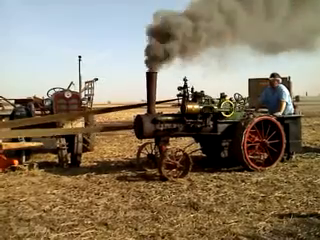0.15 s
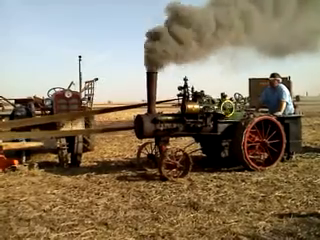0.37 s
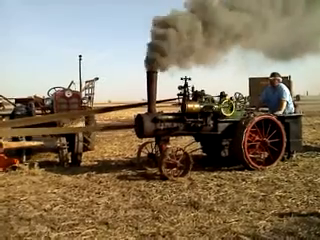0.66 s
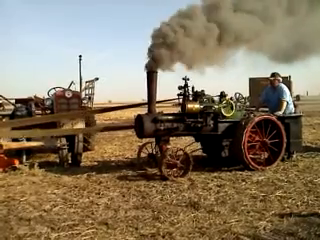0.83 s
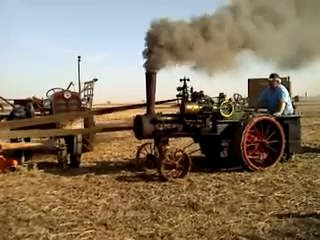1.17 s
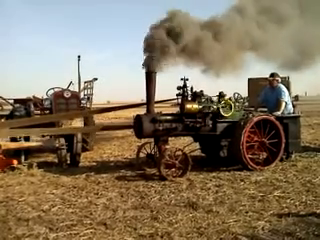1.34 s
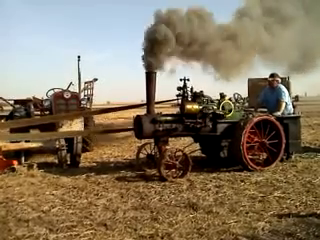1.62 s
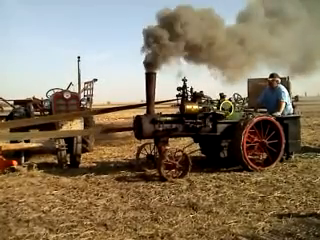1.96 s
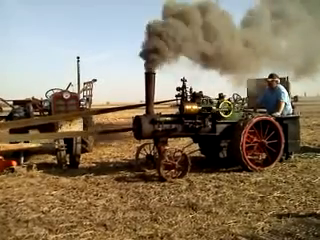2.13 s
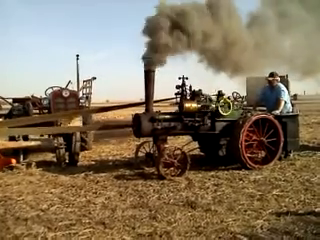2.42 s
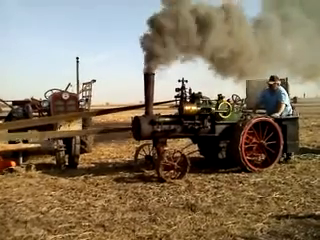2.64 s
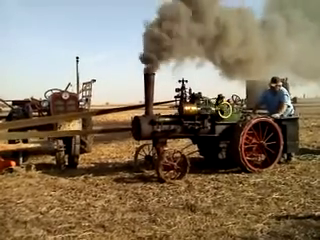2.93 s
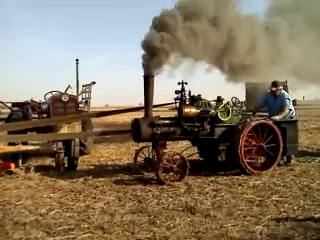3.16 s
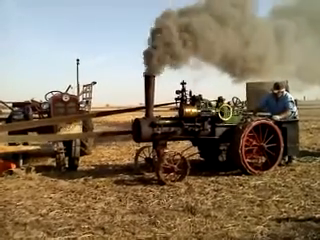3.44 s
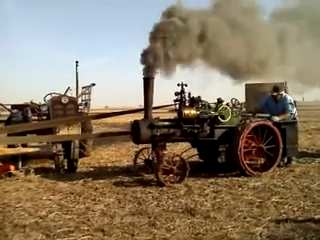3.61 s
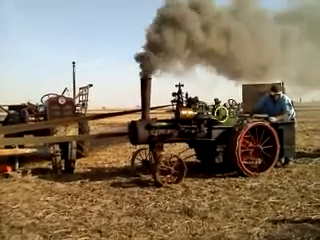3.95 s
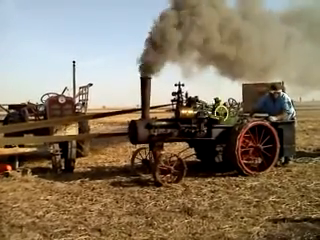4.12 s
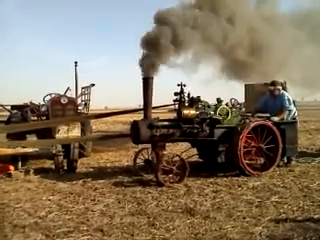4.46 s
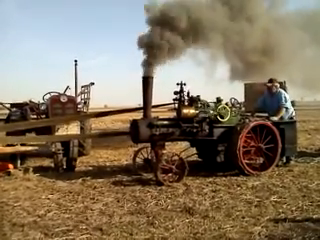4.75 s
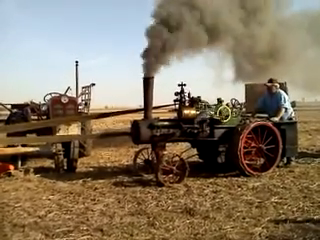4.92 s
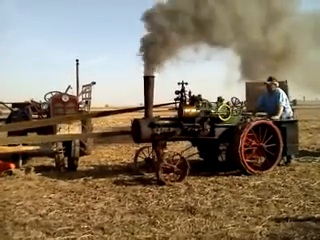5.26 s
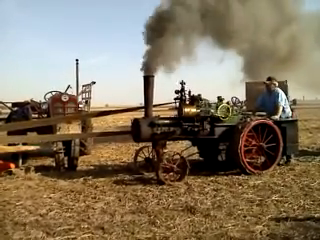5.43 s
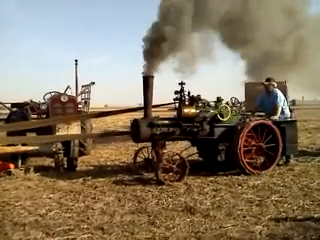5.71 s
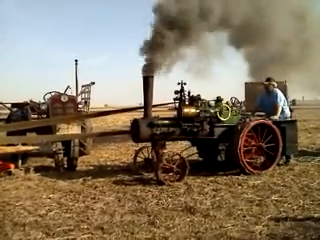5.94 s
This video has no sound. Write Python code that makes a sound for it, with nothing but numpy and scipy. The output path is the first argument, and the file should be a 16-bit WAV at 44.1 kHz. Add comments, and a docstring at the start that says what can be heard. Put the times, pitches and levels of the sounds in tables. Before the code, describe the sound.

Fast fluttering steam puffs, steady hiss and low belt rumble mix with an unsteady piercing saw scream, all distorted by a small clipping microphone.

```python
"""A harsh, fluttering roar: a steam traction engine labours on the belt of a sawmill in an open field.
Puffs of noise chuff up its stack nearly eleven times a second over hissing steam.
A skidding sine and ringing noise make the saw's screech; shaped noise makes its rasp, a hollow drone and a rumble.
A small microphone colours the noises with a low treble peak, and its overloaded amplifier clips the whole din."""
import sys
import numpy as np
from scipy.fft import rfft, irfft, next_fast_len
from scipy.io import wavfile
from scipy.ndimage import map_coordinates

SR = 44100
rng = np.random.default_rng(int(sys.argv[2]) if len(sys.argv) > 2 else 0)


def dump_mix(stems):
    """Bounce the given channels to the path in sys.argv[1] as a 16-bit WAV at rate SR."""
    frames = np.atleast_2d(stems).T  # one column per channel
    limited = np.clip(frames, -1, 1)  # hard clip at full scale
    pcm = np.round(limited * 32767).astype(np.int16)
    wavfile.write(sys.argv[1], SR, pcm)


N = 268128
TIME = np.arange(N) / SR  # seconds


def amp(db):
    """Level law: decibels become an amplitude ratio."""
    return 10 ** (np.asarray(db) / 20)


def unit(x):
    """Normalisation: the signal is scaled to an rms of 1."""
    return x / np.sqrt(np.mean(x ** 2) + 1e-20)


def curve(rows, at=TIME):
    """Linear interpolation between rows of time and value."""
    seconds, values = np.transpose(rows)
    return np.interp(at, seconds, values)


def colour(points):
    """Spectral envelope: (Hz, dB) points are joined by straight lines on a log frequency axis."""
    point_hz, point_db = np.transpose(points)

    def response(hz):
        return amp(np.interp(np.log(hz + 1), np.log(point_hz + 1), point_db))
    return response


def resonances(modes):
    """Modal superposition: second-order resonances of alternating sign add up."""
    def response(hz):
        total = 0
        for k, (centre, width, db) in enumerate(modes):
            damping = 1j * hz * width
            total = total + (-1) ** k * amp(db) * damping / (centre ** 2 - hz ** 2 + damping)
        return total
    return response


def filtered(x, response):
    """Linear filtering: the spectrum is multiplied by a frequency response."""
    size = next_fast_len(N + 8192)  # padding lets the ringing die out
    hz = np.fft.rfftfreq(size, 1 / SR)
    return irfft(rfft(x, size) * response(hz), size)[:N]


def wobble(rate):
    """Random modulation: a smooth curve runs through normal random knots, rate of them a second."""
    knots = rng.standard_normal(int(N * rate / SR) + 4)
    return map_coordinates(knots, [TIME * rate])


# Response of the microphone, which peaks in the low treble and hears little above.
# Each row: frequency in Hz, gain in dB.
MICROPHONE_RESPONSE = [(100, 1), (1250, 0), (1700, -0.3), (2000, 7), (2250, 7), (2400, 7.5), (2600, 7),
                       (2800, 8), (3050, 6.5), (3450, 1), (3800, -8.5), (4300, -30.5), (6000, -32.5),
                       (16000, -40)]


def rush(response):
    """Broadband noise: white noise takes the colour of source and microphone, then an rms of 1."""
    microphone = colour(MICROPHONE_RESPONSE)
    noise = rng.standard_normal(N)
    return unit(filtered(noise, lambda hz: response(hz) * microphone(hz)))


def swell(s, length, roundness=1.89):
    """Pulse envelope: a bump of height 1 at time s stays over a half for length seconds."""
    bump = np.zeros(N)
    near = np.abs(TIME - s) < 2 * length
    bump[near] = .5 ** (np.abs(2 * (TIME[near] - s) / length) ** roundness)
    return bump


# Effort of the engine, which rises as the saw bites harder.
# Each row: time in seconds, effort in dB.
ENGINE_EFFORT = [(0, -1.5), (.4, .6), (.65, -1.3), (1.15, .5), (1.7, 0), (2.05, .8), (2.5, 1.1),
                 (2.78, -1.6), (3.1, 2.6), (3.45, -.6), (3.95, 1), (4.5, 0.8), (5.1, -0.7), (6.08, 0.3)]


def effort(at=TIME):
    """Common load: one curve of effort drives the rumble, the screech and the steam."""
    return curve(ENGINE_EFFORT, at)


# Spectrum of the belt's rumble. Each row: frequency in Hz, relative level in dB.
RUMBLE_SPECTRUM = [(15, -27), (45, -11), (90, -1), (180, -0.5), (300, -8.5), (800, -17.5)]


def belt_rumble(level_db=-27, growth=1.2, flap_db=2):
    """Forced vibration: the belt's low noise grows with the pull on it, by growth dB per dB of effort."""
    level = level_db + growth * effort() + flap_db * wobble(12)
    return amp(level) * rush(colour(RUMBLE_SPECTRUM))


# Low resonances of the machinery. Each row: frequency in Hz, width in Hz, relative level in dB.
HOLLOW_MODES = [(335, 39, -0.5), (441, 62, -7.5)]
# Course of the drone. Each row: time in seconds, level in dB before the boost.
DRONE_COURSE = [(0, -35), (2.4, -27), (4.7, -25.5), (5.15, -18), (5.4, -28), (5.58, -20), (5.8, -29),
                (6.05, -19.5)]


def hollow_drone(boost_db=1.0, waver_db=1.2):
    """Resonance: noise through two low modes of the machinery sounds hollow and slowly wavers."""
    level = curve(DRONE_COURSE) + boost_db + waver_db * wobble(5.07)
    return amp(level) * rush(resonances(HOLLOW_MODES))


# Spectrum of the rasping teeth. Each row: frequency in Hz, relative level in dB.
RASP_SPECTRUM = [(300, -20), (900, -8), (1500, 22), (2000, 19.5), (2400, 8.5), (3200, -20), (6000, -25)]
# The teeth meet more or less wood. Each row: time in seconds, level in dB.
RASP_COURSE = [(0, -21), (.4, -13.5), (1.15, -13), (1.35, -29), (1.95, -9), (2.4, -15.5), (3.05, -13),
               (3.55, -17.5), (3.9, -15), (4.55, -14.5), (5.1, -30), (5.85, -16)]


def teeth_rasp():
    """Friction noise: the teeth tear through the log in a narrow band of noise that comes and goes."""
    return amp(curve(RASP_COURSE)) * rush(colour(RASP_SPECTRUM))


# Resonances of the blade. Each row: frequency in Hz, width in Hz, relative level in dB.
BLADE_MODES = [(2363, 87, 1.3), (2586, 28, 5), (2735, 87, -1)]
# Centre of the skidding tone. Each row: time in seconds, frequency in Hz.
SCREAM_CENTRE = [(0, 2680), (.2, 2580), (1.2, 2590), (1.38, 2690), (1.9, 2560), (2.55, 2630), (2.85, 2570),
                 (3.15, 2660), (4.5, 2570), (5.05, 2690), (6.08, 2660)]


def screech(level_db=-7.5, growth=0.51, unsteady_db=0.84, tone_db=-0.2, ring_db=-5, chatter_db=1.9):
    """Frequency modulation: a shrill tone skids about in pitch beside noise ringing in the steel's modes."""
    level = level_db + growth * effort() + unsteady_db * wobble(25)
    ring = rush(resonances(BLADE_MODES))
    drift, waver, jitter = 45 * wobble(22), 125 * wobble(100), 140 * wobble(520)  # Hz
    pitch = curve(SCREAM_CENTRE) + drift + waver + jitter
    phase = 2 * np.pi * np.cumsum(pitch) / SR
    tone = unit(np.sin(phase) * amp(chatter_db * wobble(110)))
    return amp(level) * (amp(tone_db) * tone + amp(ring_db) * ring)


# Speed of the engine, which holds and then labours a little.
# Each row: time in seconds, piston strokes a second.
ENGINE_SPEED = [(0, 10.7), (4.2, 10.64), (4.5, 10.5), (4.9, 10.5), (5.3, 10.5), (5.55, 9.9), (5.9, 10.3)]
# A few strokes cough harder. Each row: time in seconds, extra puff level in dB,
# bark level in dB above its usual mean, in place of the random scatter.
HARD_COUGHS = [(.26, 1, 5.5), (2.55, 2, 5.5), (3.62, 2.5, 4), (3.91, .5, 7), (4.47, 1.5, 5), (4.85, 0, 9),
               (5.04, 1.5, 4), (5.73, 3, 3)]
FIRST_STROKE_S = 0.07  # mean time of the first puff's height
PUFF_DB, PUFF_S = -4.5, .058  # level at zero effort; usual time above half power
BARK_DB = -17.5  # mean level of the low bark, relative to its puff
# random spread from stroke to stroke: lateness (s), puff (dB), bark (dB), log of the length
LATE_S, STRONG_DB, DEEP_DB, LONG = 0.0045, 0.7, 1.5, 0.095
UNEVEN_DB = 0.2  # the two ends of the cylinder alternate above and below the mean


def strokes():
    """Piston kinematics: integrated speed times each stroke. Rows: time (s), puff dB, length (s), bark dB."""
    travel = np.cumsum(curve(ENGINE_SPEED)) / SR
    travel = travel - np.interp(FIRST_STROKE_S, TIME, travel)
    number = np.arange(int(travel[-1]) + 1)
    late, strong, long, deep = rng.standard_normal((len(number), 4)).T
    times = np.interp(number, travel, TIME) + LATE_S * late
    puff = PUFF_DB + effort(times) + UNEVEN_DB * (-1) ** number + STRONG_DB * strong
    length = PUFF_S * np.exp(LONG * long)
    bark = BARK_DB + DEEP_DB * deep
    for s, puff_db, bark_db in HARD_COUGHS:
        nearest = np.argmin(np.abs(times - s))
        puff[nearest] += puff_db
        bark[nearest] = BARK_DB + bark_db
    return np.transpose([times, puff, length, puff + bark])


def steam_flow(chuffs, hiss_db=-12):
    """Power addition: a swell at each stroke adds to a hiss that follows the effort; gives amplitude."""
    hiss_power = amp(hiss_db + effort()) ** 2
    puff_power = sum(amp(db) ** 2 * swell(s, length) for s, db, length, _ in chuffs)
    return np.sqrt(hiss_power + puff_power)


# Spectrum of the steam jet. Each row: frequency in Hz, relative level in dB.
STEAM_SPECTRUM = [(20, -21), (70, -8), (160, -7), (420, -4.5), (600, -2), (1000, 0), (1500, 0.5),
                  (1950, -2), (2400, 0), (3200, 0), (9000, 3.5)]
# Spectrum of the low bark. Each row: frequency in Hz, relative level in dB.
BARK_SPECTRUM = [(60, -26), (200, -4.5), (350, 2), (500, 0.5), (900, -5), (2000, -14), (5000, -32)]


def exhaust(chuffs, flow, bark_share=0.79, flutter_db=2.06, bark_flutter_db=2.0):
    """Jet turbulence: steam noise swells at each stroke, with a shorter low bark at its height."""
    bark_power = sum(amp(db) ** 2 * swell(s, bark_share * length) for s, _, length, db in chuffs)
    # eddies at the mouth of the stack make every puff ragged
    jet = flow * rush(colour(STEAM_SPECTRUM)) * amp(flutter_db * wobble(70))
    bark = np.sqrt(bark_power) * rush(colour(BARK_SPECTRUM)) * amp(bark_flutter_db * wobble(50))
    return jet + bark


# The whole din dips briefly between some strokes.
# Each row: time in seconds, gain at the bottom in dB, time beyond half that depth in seconds.
BRIEF_LULLS = [(0.558, -5, .014), (1.892, -3.5, 0.016), (3.579, -4, 0.014), (5.674, -7, 0.015)]


def lulls():
    """Amplitude modulation: the gain of the whole din dips for a moment here and there."""
    return amp(sum(db * swell(s, length) for s, db, length in BRIEF_LULLS))


def scene(surge=0.27):
    """Superposition: engine and mill add at one spot; the screech surges a little with the steam flow."""
    chuffs = strokes()
    flow = steam_flow(chuffs)
    mill = belt_rumble() + hollow_drone() + teeth_rasp()
    saw = screech() * unit(flow) ** surge
    din = mill + saw + exhaust(chuffs, flow)
    return (din * lulls())[None]


# The stage after the overloaded amplifier softens the top. Each row: frequency in Hz, gain in dB.
TREBLE_RESPONSE = [(4000, 0), (8000, -1.83), (10000, -1.5), (12500, -4), (15500, -1.5)]
TOP_HZ = 15750  # nothing passes from here up


def record(dry, ceiling=0.69, hardness=16):
    """Nonlinear distortion: overload flattens the wave tops, adding treble; then the band is limited."""
    x = dry[0]
    clipped = x / (1 + np.abs(x / ceiling) ** hardness) ** (1 / hardness)
    treble = colour(TREBLE_RESPONSE)
    return filtered(clipped, lambda hz: treble(hz) * (hz < TOP_HZ))[None]


dry = scene()
out = record(dry)
dump_mix(out)
```